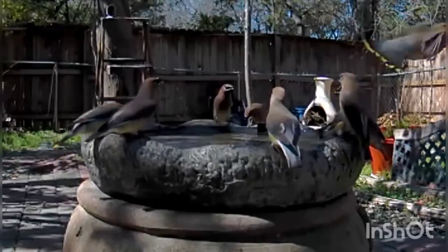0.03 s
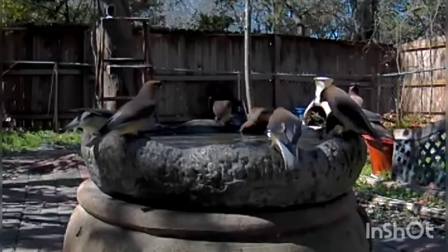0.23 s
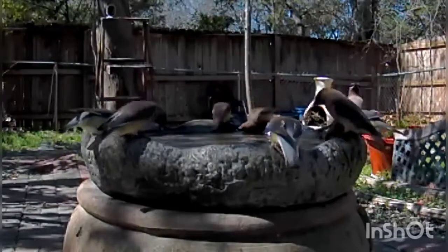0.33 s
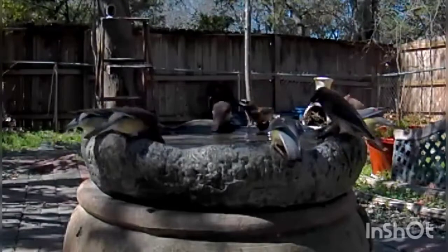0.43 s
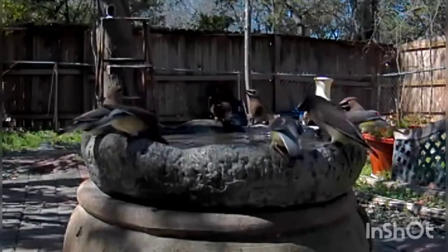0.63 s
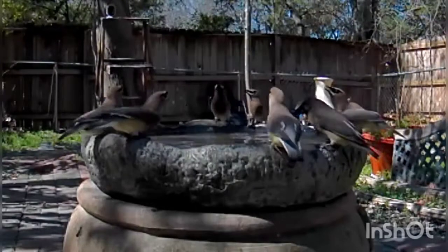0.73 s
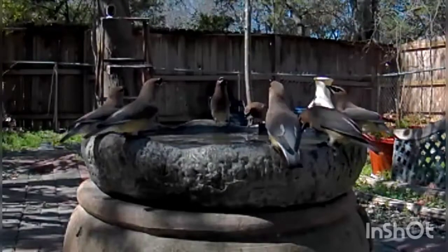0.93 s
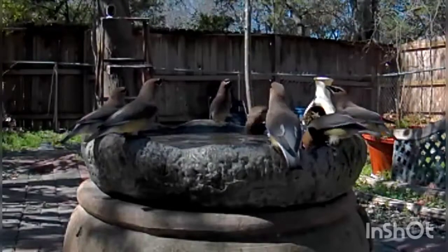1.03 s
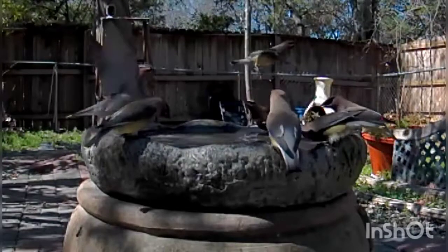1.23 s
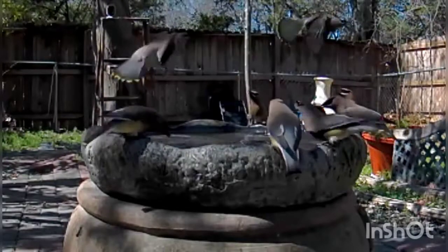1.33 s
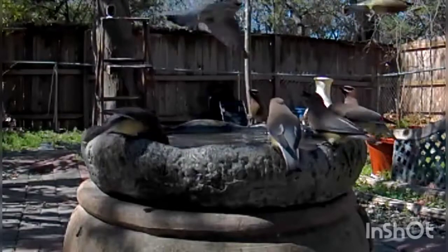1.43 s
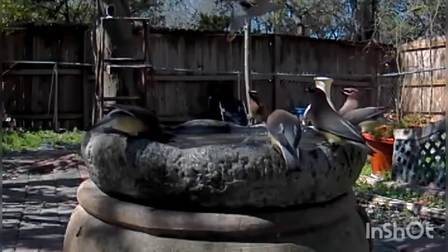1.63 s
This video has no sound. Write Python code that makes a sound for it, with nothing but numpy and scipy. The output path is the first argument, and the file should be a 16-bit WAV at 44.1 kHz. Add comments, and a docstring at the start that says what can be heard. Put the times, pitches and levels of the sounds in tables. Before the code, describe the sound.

Quick bursts of wingbeats from small birds at a birdbath, ending with a faint trill.

```python
"""Small birds flutter around a stone birdbath, close to the microphone. Each wingbeat is a push of air,
a swish and a rustle of feathers. One wing puffs right at the microphone, feathers snap in a scuffle,
and a bird gives a thin high trill. The recorder's low cut makes every push ring briefly.
Behind them the yard rumbles faintly, other birds whistle, and the fence and house echo."""
import sys
import numpy as np
from scipy import signal
from scipy.fft import rfft, irfft, next_fast_len
from scipy.io import wavfile
from scipy.ndimage import map_coordinates

SR = 44100
rng = np.random.default_rng(int(sys.argv[2]) if len(sys.argv) > 2 else 0)


def inscribe(sig):
    """Save sig as 16-bit PCM at rate SR to the path in sys.argv[1].

    A 1-D sig is mono; a 2-D sig holds one channel per row.
    Samples are clipped to [-1, 1] before scaling.
    """
    pcm = np.round(np.clip(np.atleast_2d(sig).T, -1, 1) * 32767)
    wavfile.write(sys.argv[1], SR, pcm.astype(np.int16))


N = 74970
T = np.arange(N) / SR

# distant whistles: centre_s, level_db, pitch_hz
WHISTLE_CALLS = [(0.16, -89.5, 6480), (0.73, -86.5, 6510), (1.408, -91.5, 6430)]
# wash between wingbeats: time_s, air_db, feather_db
STIR_LEVELS = [(0, -55, -66.5), (0.121, -54, -77), (.21, -57, -82), (0.301, -60.5, -79.5),
               (0.399, -64.5, -86), (0.601, -63.5, -104), (0.681, -58, -91), (0.759, -59.5, -84.5),
               (0.859, -54, -71.5), (1.019, -50.5, -70), (1.079, -63.5, -75), (1.139, -74, -87.5),
               (1.346, -70.5, -93), (1.44, -66.5, -79), (1.542, -60, -73.5), (1.7, -66, -74)]
# trill: centre_s, level_db, top_pitch_hz
TRILL_NOTES = [(1.523, -72.5, 7390), (1.543, -67.5, 7370), (1.565, -62, 7400), (1.585, -66, 7330),
               (1.606, -65.5, 7140), (1.624, -65.5, 7480), (1.644, -79.5, 7150)]
# feathers snapping past each other: time_s, relative_db, centre_hz
FEATHER_SNAPS = [(0.8304, -47, 1600), (0.835, -50, 1720), (0.861, -51, 1180), (0.891, -58.5, 1100),
                 (0.902, -49, 2000), (0.963, -53.5, 2400), (0.9675, -45.5, 2260), (0.972, -55, 4040),
                 (0.977, -43, 2820), (0.9946, -58.5, 3100), (0.9956, -54, 2790), (1.014, -52.5, 2700),
                 (1.0174, -49.5, 2870), (1.023, -55, 2200), (1.4708, -58.5, 1400)]
# air hitting the microphone directly: time_s, level_db, width_s
CLOSE_PUFFS = [(0.233, -29, 0.00092), (0.2465, -28.5, 0.00091), (0.264, -42.5, 0.0031),
               (0.2776, -37.5, 0.0011), (0.947, -33.5, 0.0005), (0.951, -36.5, 0.0017)]
# wing strokes, levels before each layer's offset: time_s, push_db, swish_db, rustle_db
WINGBEATS = [(0.005, -49.5, -55, -63), (0.055, -52.5, -57, -70), (0.104, -52, -58.5, -79),
             (0.153, -52, -66, -73.5), (0.214, -45, -63, -67.5), (0.266, -47, -62, -71),
             (0.312, -48, -65.5, -67.5), (0.364, -48, -71.5, -87), (0.411, -47.5, -68.5, -79),
             (0.464, -54.5, -68, -85), (0.505, -59.5, -67.5, -94), (0.563, -54.5, -72, -83),
             (0.749, -47, -73, -81), (0.7896, -45.5, -60.5, -66), (0.838, -38.5, -54.5, -61),
             (0.861, -39, -62, -79), (0.894, -37.5, -57, -56.5), (0.945, -42.5, -54, -55.5),
             (1.01, -43.5, -59, -53), (1.045, -55.5, -75, -76), (1.459, -53, -59, -67),
             (1.508, -46.5, -58.5, -58), (1.555, -46.5, -57, -62.5), (1.605, -47, -61, -62.5),
             (1.647, -50.5, -58.5, -63.5), (1.694, -50.5, -60.5, -71)]
# noise spectra: freq_hz, relative_db
YARD_SPECTRUM = [(25, -52.5), (55, -39), (90, -18), (130, 2), (200, -14.5), (400, -17), (1000, -28),
                 (2000, -35), (5000, -43), (7000, -45.5), (7800, -53.5)]
STIR_SPECTRUM = [(30, 9.5), (75, 1), (125, 24.5), (200, 9), (450, 0), (1000, -6), (2000, -22.5),
                 (4000, -24.5), (7000, -34.5), (7800, -61)]
EDDY_SPECTRUM = [(30, -46.5), (80, -40.5), (130, 4), (190, -10), (280, -10), (450, -19.5), (800, -28),
                 (2000, -68.5)]
SWISH_SPECTRUM = [(150, -17), (400, 9), (700, 3), (1100, 1), (1900, -8.5), (3000, -25.5), (7000, -26)]
RUSTLE_SPECTRUM = [(700, 5), (2200, 1.5), (4200, -5.5), (5000, -9.5), (7000, -6), (7400, -7), (7800, -49)]


def amp(db):
    """Decibels to gain."""
    return 10 ** (np.asarray(db) / 20)


def unit_rms(x):
    """Scale to rms 1."""
    return x / np.sqrt(np.mean(x ** 2) + 1e-20)


def filtered(x, response):
    """Apply a complex response(hz)."""
    size = next_fast_len(N + SR // 2)
    return irfft(rfft(x, size) * response(np.fft.rfftfreq(size, 1 / SR)), size)[:N]


def low_pass(x, edge_hz, order):
    """Zero-phase Butterworth-shaped low-pass."""
    return filtered(x, lambda hz: 1 / np.sqrt(1 + (hz / edge_hz) ** (2 * order)))


def coloured(x, spectrum):
    """Shape x by (freq_hz, relative_db) points."""
    freq_hz, db = np.transpose(spectrum)
    return filtered(x, lambda hz: amp(np.interp(np.log(hz + 1), np.log(freq_hz), db)))


def wobble(knots_per_s):
    """Smooth random curve."""
    return map_coordinates(rng.standard_normal(N // 8), [T * knots_per_s], mode="wrap")


def noise(spectrum, grain_db=0):
    """Coloured noise, rms 1; a fast random gain of depth grain_db makes it grainy."""
    white = rng.standard_normal(N) * amp(grain_db * wobble(900))
    return unit_rms(coloured(white, spectrum))


def swells(peaks_s, levels_db, rise_s, fall_s):
    """Burst envelope: Gaussian rises, exponential falls, summed in power."""
    t = T - peaks_s[:, None]
    shape = np.exp(-(np.minimum(t, 0) / rise_s) ** 2 - np.maximum(t, 0) / fall_s)
    return np.sqrt(np.sum((amp(levels_db)[:, None] * shape) ** 2, axis=0))


def low_cut(hz, corner_hz, q):
    """Complex response of a two-pole high-pass."""
    return -hz ** 2 / (corner_hz ** 2 - hz ** 2 + 1j * hz * corner_hz / q)


def pressure_pulse(time_s, level_db, width_s):
    """One smooth air pulse, ringing in the recorder's low cut."""
    pulse = np.exp(-.5 * ((T - time_s) / width_s) ** 2)
    ringing = filtered(pulse, lambda hz: -low_cut(hz, 137, q=3.6) * low_cut(hz, 110, q=0.57))
    return amp(level_db) * ringing / np.abs(ringing).max()


def yard(level_db=-68.5):
    """Distant rumble and faint hiss."""
    return amp(level_db + wobble(13)) * noise(YARD_SPECTRUM)


def whistles(length_s=.17, waver_hz=230):
    """Far birds: faint high tones, roughened by pitch jitter."""
    calls = np.zeros(N)
    for centre_s, level_db, pitch_hz in WHISTLE_CALLS:
        position = np.clip(2 * (T - centre_s) / length_s, -1, 1)
        phase = 2 * np.pi * np.cumsum(pitch_hz + waver_hz * wobble(800)) / SR
        calls += amp(level_db) * (1 - position ** 2) * np.sin(phase)
    return calls


def wall_echo(x, level_db=-13, t60_s=.22, delay_s=.004):
    """Short scattered echo off the fence and house."""
    tail = rng.standard_normal(N) * amp(-60 * T / t60_s) * (T > delay_s)
    return amp(level_db) * signal.fftconvolve(x, tail / np.linalg.norm(tail))[:N]


def flock_stir():
    """Soft unsteady wash of air and feathers from all the wings."""
    time_s, air_db, feather_db = np.transpose(STIR_LEVELS)
    flicker_db = 1.2 * wobble(60)
    air = noise(STIR_SPECTRUM) * amp(np.interp(T, time_s, air_db) + flicker_db)
    feathers = noise(RUSTLE_SPECTRUM, grain_db=2.5) * amp(np.interp(T, time_s, feather_db) + flicker_db)
    return air + feathers


def trill(note_s=.017, arch_hz=460, waver_hz=140, sideband_hz=1300, sideband_db=-22, rasp_db=2):
    """Quick row of thin, rasping arched notes with a weak upper sideband."""
    song = np.zeros(N)
    for centre_s, level_db, top_pitch_hz in TRILL_NOTES:
        position = np.clip(2 * (T - centre_s) / note_s, -1, 1)
        pitch_hz = top_pitch_hz - arch_hz * position ** 2 + waver_hz * wobble(700)
        phase = 2 * np.pi * np.cumsum(pitch_hz) / SR
        sideband = amp(sideband_db) * np.sin(phase + 2 * np.pi * sideband_hz * T)
        song += amp(level_db) * np.sqrt(1 - position ** 2) * (np.sin(phase) + sideband)
    return song * unit_rms(amp(rasp_db * wobble(600)))


def feather_snaps(click_db=3, chafe_db=-4):
    """Stiff flight feathers click as wings brush together, then chafe briefly."""
    snaps = np.zeros(N)
    for time_s, db, hz in FEATHER_SNAPS:
        spectrum = [(hz / 4, -8), (hz, 0), (1.17 * hz, -1), (2 * hz, -18), (4 * hz, -26.5)]
        impulse = 1.0 * (np.arange(N) == round(time_s * SR))
        click = coloured(impulse, spectrum)
        chafe = noise(spectrum) * swells(np.array([time_s]), [db + chafe_db], rise_s=.0003, fall_s=.0014)
        snaps += amp(db + click_db) * click / click.max() + chafe
    return snaps


def close_puffs():
    """Dull thumps of air from a wing passing very close."""
    pulses = sum(pressure_pulse(*puff) for puff in CLOSE_PUFFS)
    return low_pass(pulses, edge_hz=500, order=10)


def air_pushes(push_offset_db=-1, eddy_offset_db=-5.5):
    """Each stroke pushes air at the microphone and sheds low eddies."""
    time_s, push_db, _, _ = np.transpose(WINGBEATS)
    pushes = sum(pressure_pulse(s, db + push_offset_db, width_s=.001) for s, db in zip(time_s, push_db))
    eddies = noise(EDDY_SPECTRUM) * swells(time_s, push_db + eddy_offset_db, rise_s=.011, fall_s=.013)
    return pushes + eddies


def wing_swishes(swish_lag_s=.0055, rustle_lag_s=.0046):
    """Feathers swish and rustle just after each push."""
    time_s, _, swish_db, rustle_db = np.transpose(WINGBEATS)
    swish_envelope = swells(time_s + swish_lag_s, swish_db + .5, rise_s=.003, fall_s=.0096)
    rustle_envelope = swells(time_s + rustle_lag_s, rustle_db - 6.5, rise_s=.006, fall_s=.013)
    return noise(SWISH_SPECTRUM) * swish_envelope + noise(RUSTLE_SPECTRUM, grain_db=1) * rustle_envelope


def scene():
    """Birds, echo and yard, mono. Air pushes carry only close by: no echo."""
    wings = low_pass(wing_swishes() + feather_snaps(), edge_hz=6810, order=50)
    birds = wings + trill() + whistles()
    return (birds + wall_echo(birds) + air_pushes() + close_puffs() + flock_stir() + yard())[None]


def record(dry):
    """Recorder: thinned deep bass, steep upper band limit."""
    bass_cut_hz = 120
    thinned = filtered(dry[0], lambda hz: hz ** 2 / np.hypot(hz ** 2, bass_cut_hz ** 2))
    return low_pass(thinned, edge_hz=8900, order=40)[None]


dry = scene()
out = record(dry)
inscribe(out)
```